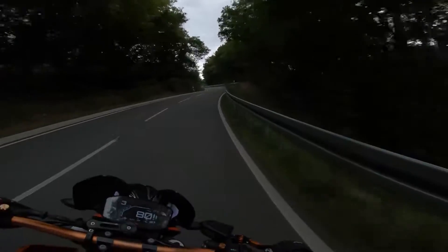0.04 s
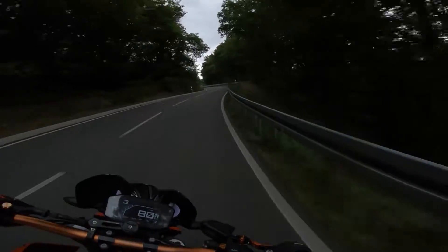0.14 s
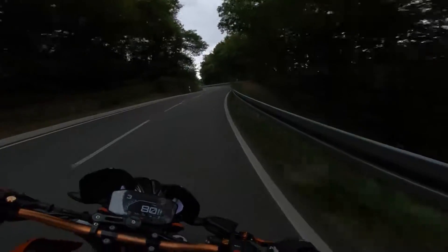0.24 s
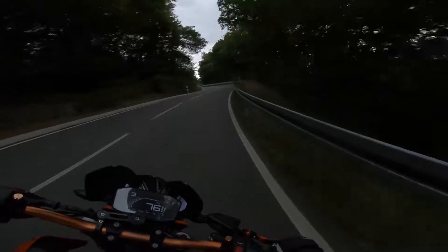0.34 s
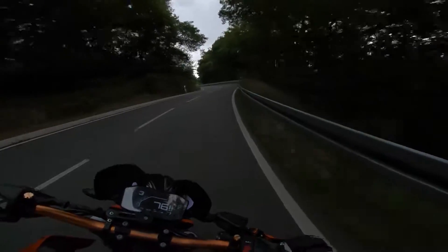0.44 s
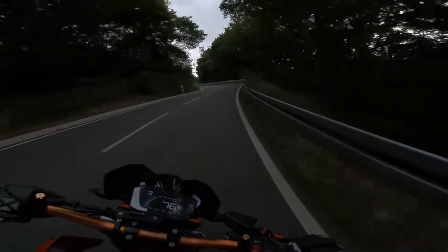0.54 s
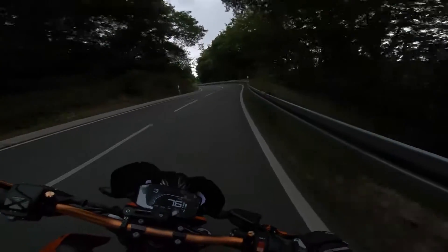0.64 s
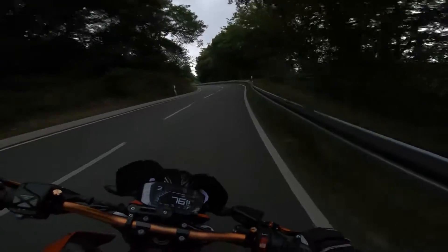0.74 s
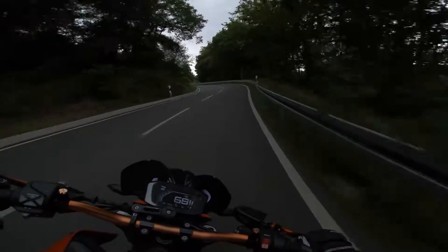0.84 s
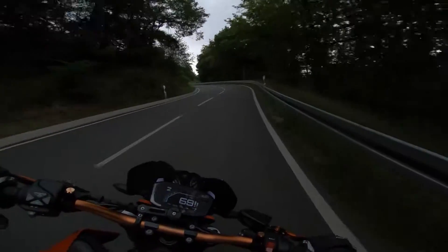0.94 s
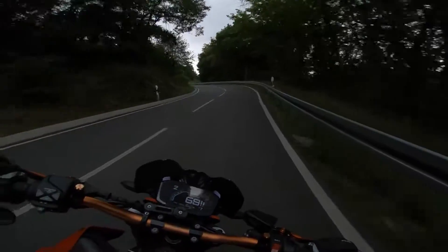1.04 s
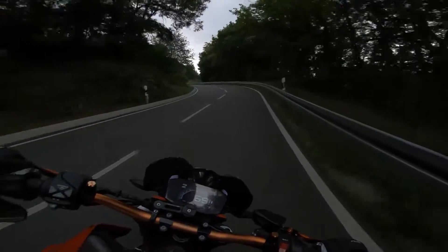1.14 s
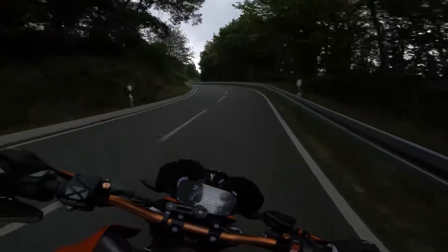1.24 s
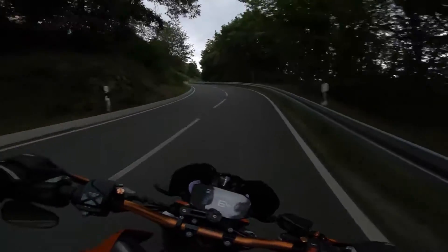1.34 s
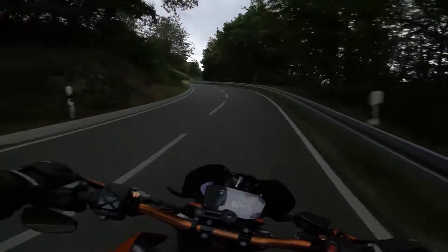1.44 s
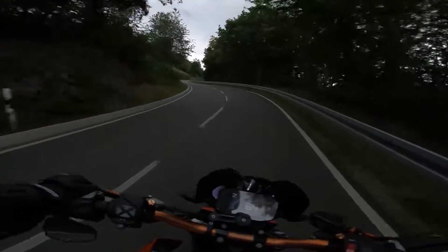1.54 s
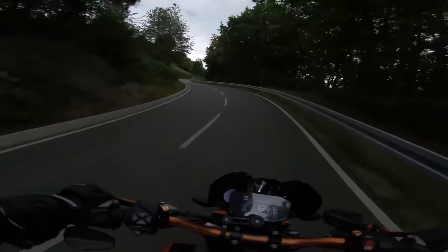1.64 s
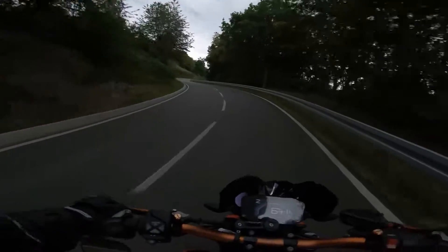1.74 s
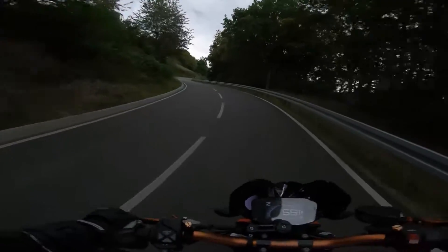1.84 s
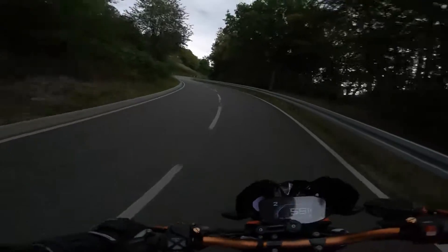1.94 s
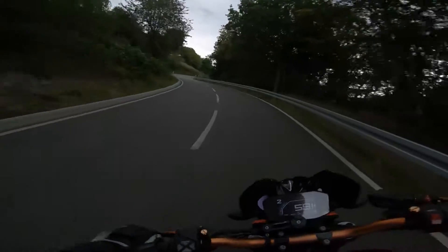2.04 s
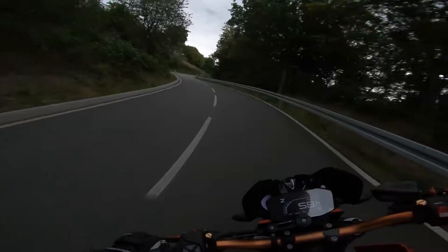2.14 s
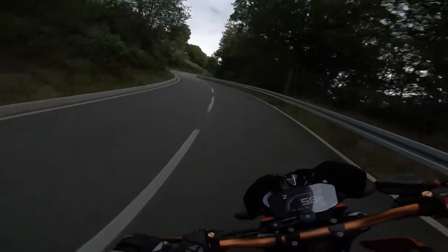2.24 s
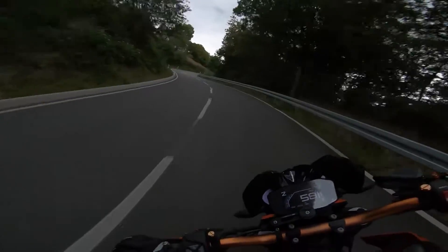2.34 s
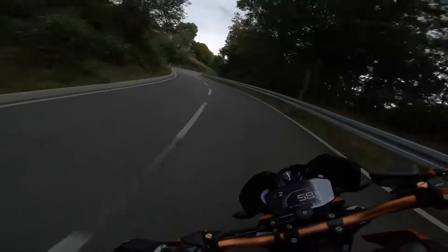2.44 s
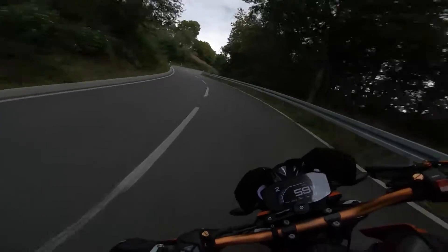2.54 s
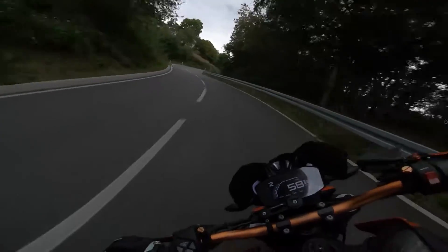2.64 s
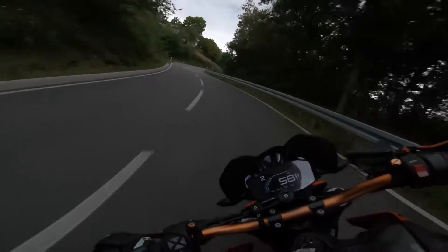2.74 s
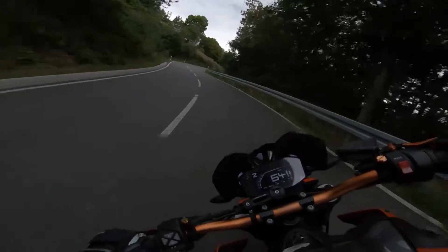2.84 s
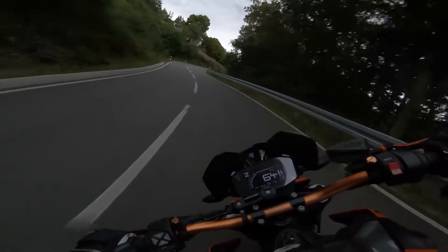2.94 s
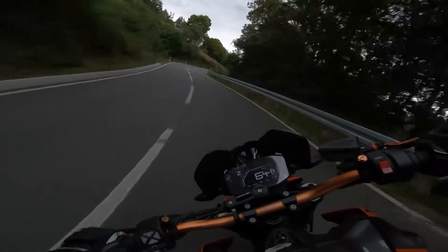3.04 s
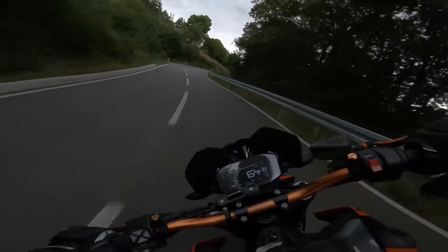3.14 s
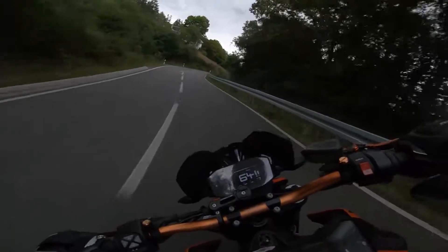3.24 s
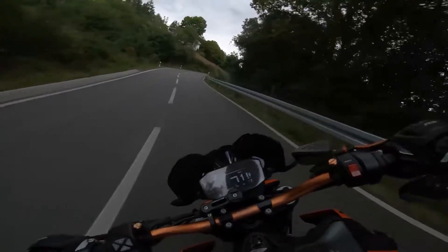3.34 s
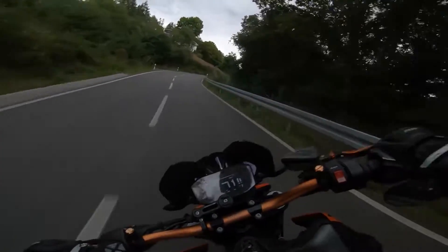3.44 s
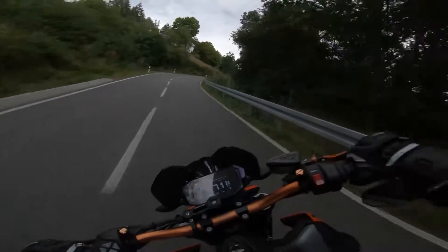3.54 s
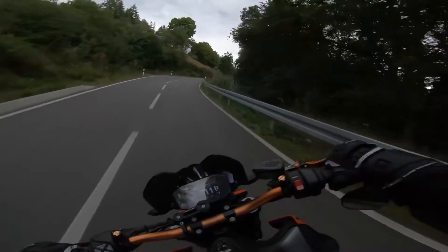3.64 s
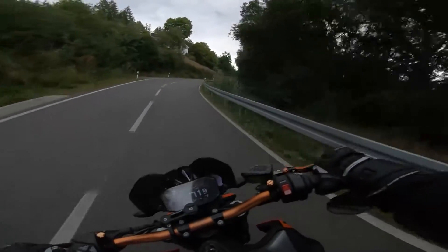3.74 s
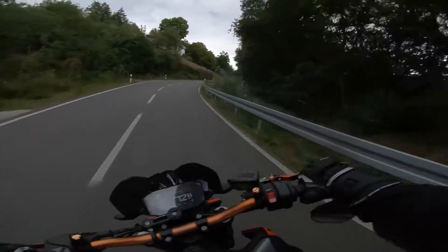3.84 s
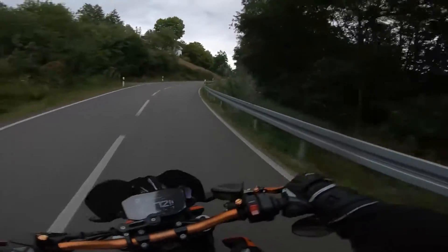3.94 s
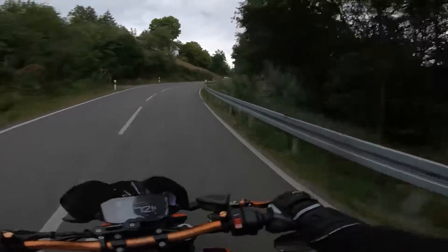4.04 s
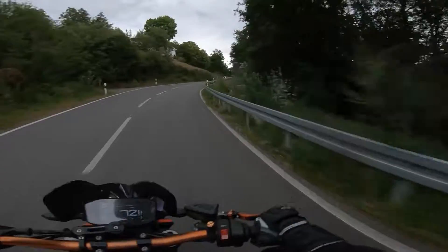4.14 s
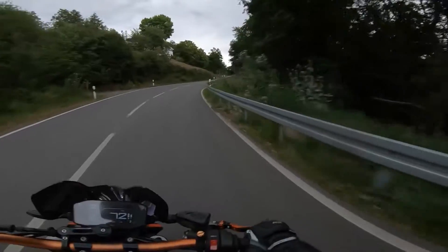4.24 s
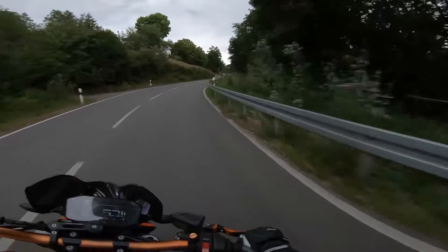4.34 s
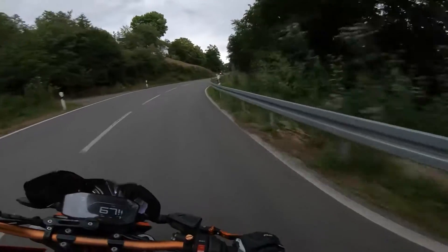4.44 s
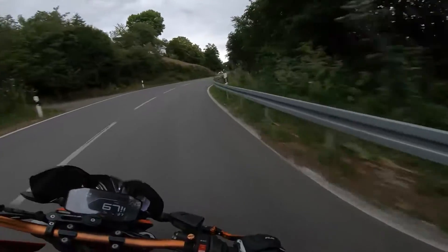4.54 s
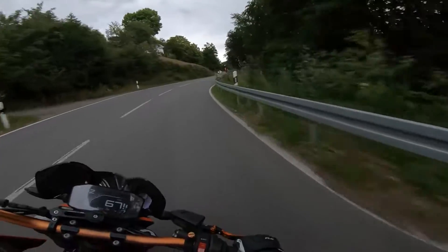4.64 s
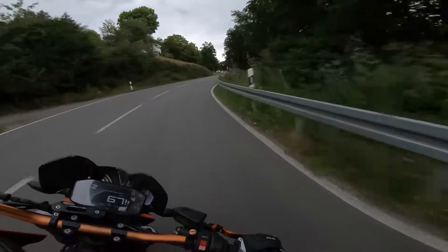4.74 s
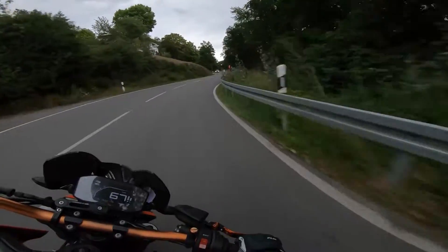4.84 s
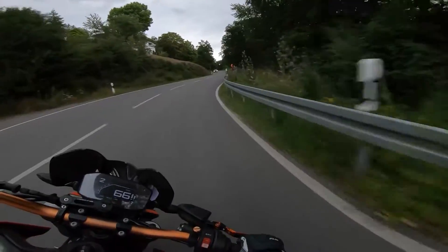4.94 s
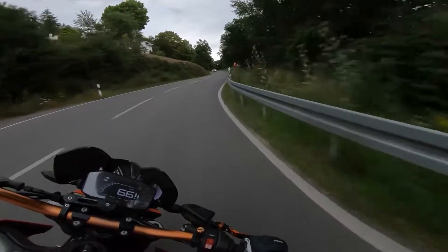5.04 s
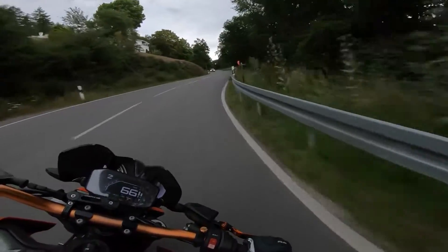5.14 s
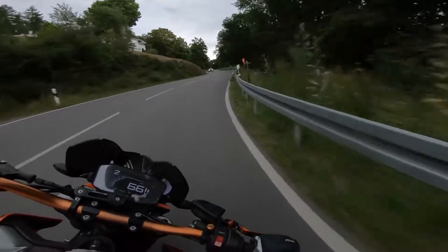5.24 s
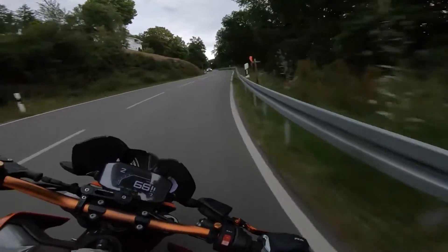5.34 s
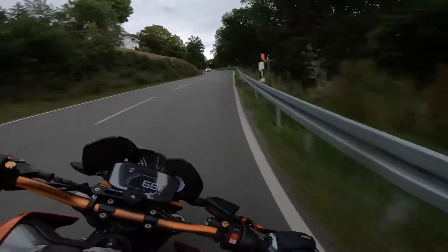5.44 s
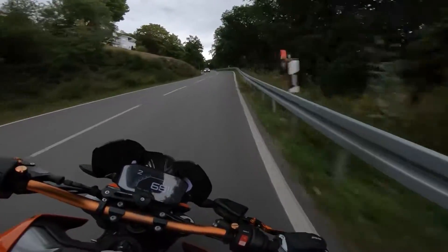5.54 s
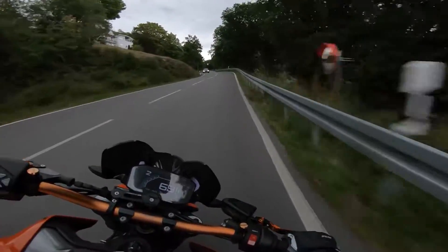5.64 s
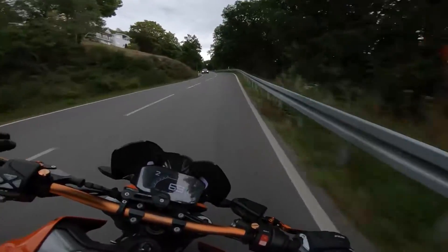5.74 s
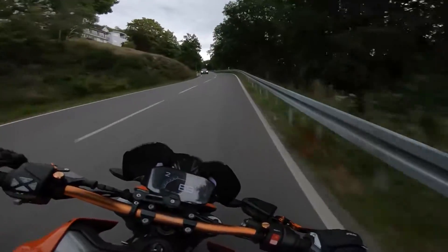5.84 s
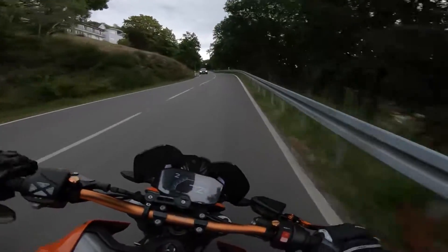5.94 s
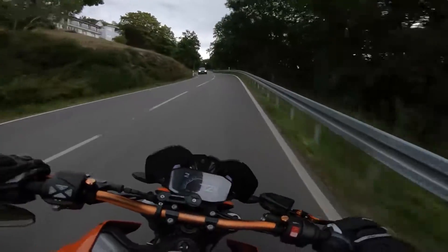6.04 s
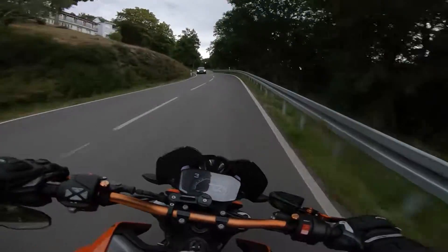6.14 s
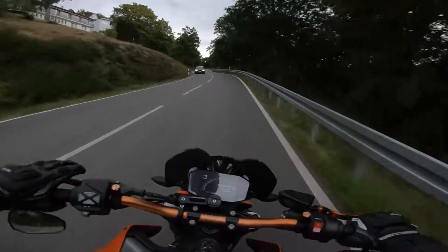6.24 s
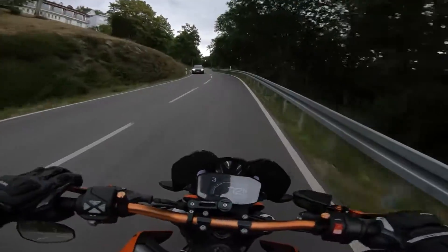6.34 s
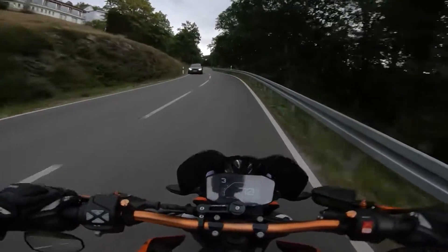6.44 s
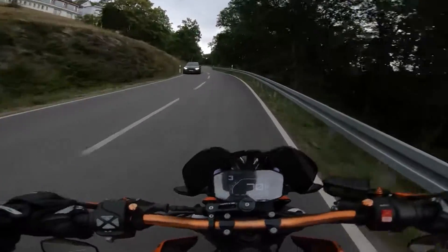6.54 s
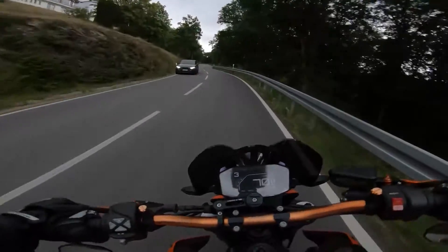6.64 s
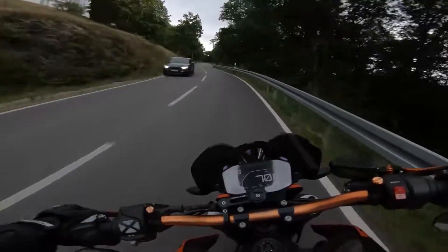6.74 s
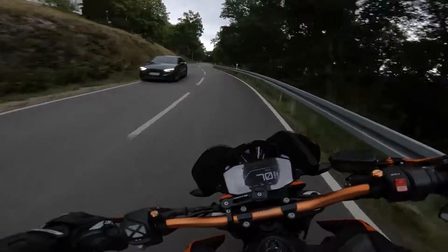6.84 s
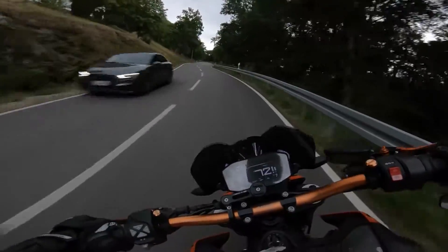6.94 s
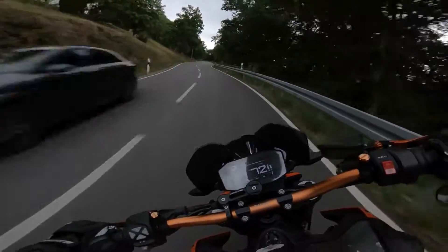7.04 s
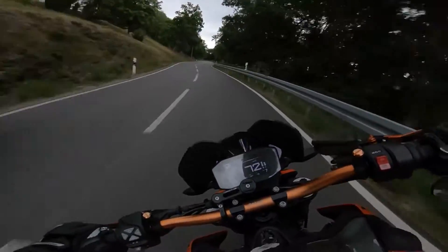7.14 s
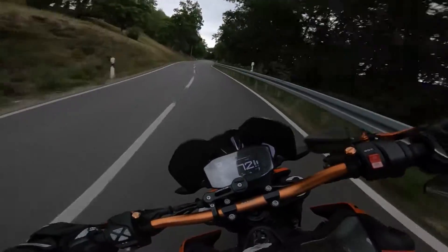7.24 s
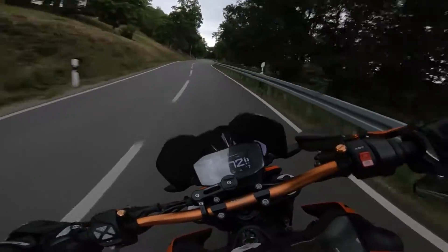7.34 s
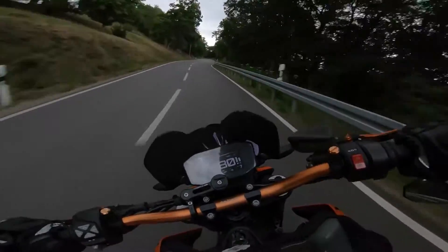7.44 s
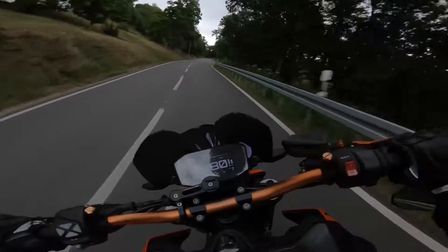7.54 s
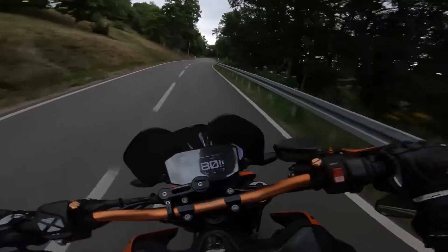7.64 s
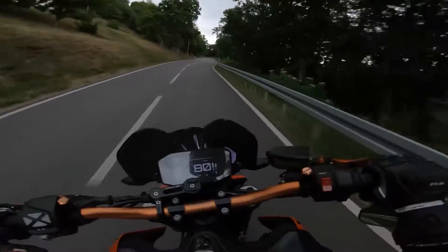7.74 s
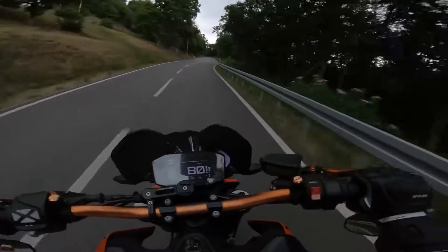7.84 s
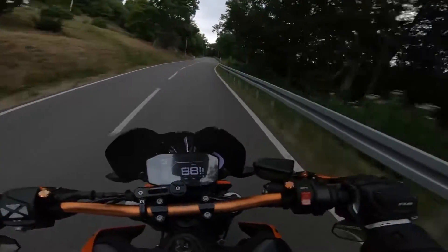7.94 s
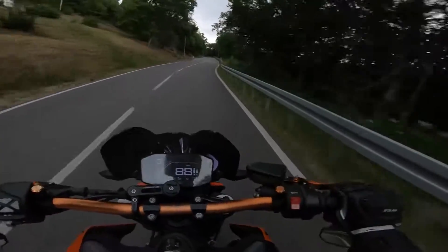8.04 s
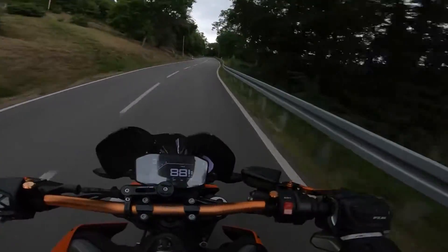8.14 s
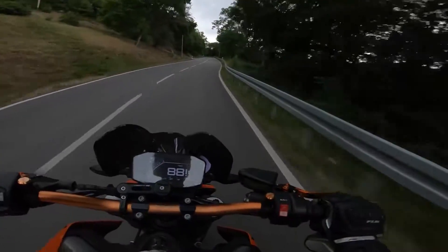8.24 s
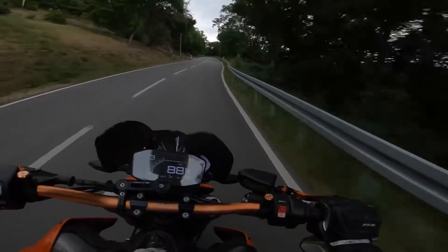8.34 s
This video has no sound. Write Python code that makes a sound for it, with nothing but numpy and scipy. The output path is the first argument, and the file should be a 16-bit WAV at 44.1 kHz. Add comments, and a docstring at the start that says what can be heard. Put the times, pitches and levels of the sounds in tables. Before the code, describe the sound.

A two-cylinder motorcycle throbs along, pulling and easing off several times, with exhaust pops while coasting and wind rushing behind.

```python
"""A two-cylinder motorcycle throbs along a country road, pulling and easing off, heard by the rider.
Two unevenly spaced firings in each engine cycle make the exhaust pipe ring and rasp, and the airbox
(where the engine breathes in) booms as the throttle opens. With the throttle shut and the revs low,
the engine stumbles and pops. Panels drone and gears whine under load. Behind them, wind buffets
the rider, and air rushing into and past the engine swells with the throttle."""
import sys
import numpy as np
from scipy import signal
from scipy.fft import rfft, irfft
from scipy.io import wavfile
from scipy.ndimage import uniform_filter1d

SR = 44100
rng = np.random.default_rng(int(sys.argv[2]) if len(sys.argv) > 2 else 0)


def file_out(sig):
    """Save sig as 16-bit WAV at sys.argv[1]."""
    # one column per channel
    cols = np.atleast_2d(sig).T
    # limit, then scale
    lim = np.clip(cols, -1, 1)
    pcm = np.round(lim * 32767).astype(np.int16)
    wavfile.write(sys.argv[1], SR, pcm)


N = 370440
TIME = np.arange(N) / SR

# The revs, shifting down at 0.7 s and up at 6.2 s. Each row: time in seconds, engine cycles per second.
ENGINE_SPEED = [(0.0, 40.8), (0.19, 39.55), (0.54, 37.35), (0.65, 37.75), (0.72, 46.55), (1.12, 43.75),
                (1.94, 38.7), (2.43, 42.35), (3.0, 49.2), (3.41, 53.2), (3.68, 50.1), (4.2, 45.4),
                (4.52, 44.5), (5.5, 49.7), (5.98, 50.25), (6.24, 37.55), (6.53, 37.05), (6.79, 38.75),
                (7.3, 44.7), (7.95, 49.4), (8.4, 54.45)]
# Pulls on the throttle; the first stays barely open. Each row: four times in seconds (opens, starts to
# widen, stops widening, is shut), opening 0-1, burn 0-1, panel drone in dB, gear whine in dB,
# extra engine level in dB.
THROTTLE_PULLS = [(-0.3, -0.25, -1.5, 0.66, 0.2, 0.8, -52, -88, 3.8),
                  (1.85, 2.3, 2.9, 3.65, 0.63, 0.96, -44, -73, 0),
                  (4.58, 5, 5.5, 6.05, 0.31, 1.0, -34.5, -79, -1.5),
                  (6.36, 6.22, 7.42, 9.02, 0.96, 0.93, -45, -72, 0)]
# Loudness under load. Each row: throttle 0-1, then gains in dB for exhaust, intake, rasp, rushing air.
LOAD_GAINS = [(0, 32, 3.5, -52.5, -42.5), (0.1, 31.3, 10, -58.5, -40.5), (0.3, 35, 17.5, -51.5, -35.3),
              (0.65, 39.3, 23, -42.3, -35), (1, 34.5, 31.5, -36.5, -32)]
# The tone of one exhaust pulse. Each row: frequency in Hz, level in dB coasting, level in dB firing.
PIPE_TONE = [(20.0, -31, 3), (44, -29.5, -13.5), (88.5, -16.5, -23.5), (119.7, 0.5, -6), (150.2, -0.5, -14),
             (165, -14.5, -5.5), (202.1, -20.5, -4), (242.7, -8.5, -17.5), (289.3, -8.5, -20.5),
             (357, -27, -36.5), (457, -35, -32), (547, -27, -24.5), (750, -37.5, -40.5), (1389, -55.5, -75)]
# The tones of six more sounds. Each row: frequency in Hz, relative level in dB.
AIRBOX_TONE = [(20.0, -31.5), (45.0, -10.5), (85.0, -15), (115.0, -6), (145.0, -1.5), (175.0, -5),
               (205.0, -5.5), (240.0, 0), (290.0, -0.5), (340.0, -2), (440.0, -14.5), (560.0, -27.5),
               (780.0, -28), (1500.0, -50)]  # one gulp of air
GAS_TONE = [(350, -27.5), (600, 4.5), (800, 4.5), (1000, -1.5), (1250, -1.5), (1390, 3.5), (1540, -1),
            (1700, -2.5), (2400, -10), (3200, -22.5), (4000, -31), (5000, -32.5), (7500, -45.5),
            (8800, -48.5), (10200, -48.5), (15000, -58.5)]  # gas leaving the silencer
CRACK_TONE = [(200, -12), (500, 2), (900, -1), (1400, 0), (2200, -2), (3200, -22), (5000, -28), (8000, -42),
              (14000, -58)]  # the sharp part of a pop
THUMP_TONE = [(30, -16), (80, -4), (135, 3), (180, -3), (280, 0), (400, -11), (700, -19), (1200, -32)]  # the hollow part of a pop
BUFFET_TONE = [(15, -6.5), (30, -3), (50, -4.5), (80, -5), (160, -8.5), (400, -30), (1000, -65)]  # wind hitting the rider
RUSH_TONE = [(60, 0), (150, 11.5), (300, 5.5), (450, 3.5), (700, 0), (950, -11.5), (1400, -17), (2200, -29),
             (3200, -30), (4200, -42), (6300, -46), (8500, -60.5), (15000, -66)]  # air rushing into and past the engine
# Loud pops in the pipe. Each row: start in seconds, crack gain in dB, thump gain in dB.
LOUD_POPS = [(0.5857, -29, -20.5), (1.0817, -23, -14), (1.2871, -18, -14), (1.3273, -26, -19),
             (1.3591, -17, -14), (1.4776, -18, -12), (1.5523, -21, -13.5), (1.8249, -29, -19),
             (1.974, -26, -19.5), (4.5256, -16.5, -11.5), (6.108, -18, -17), (6.2848, -29, -16)]
# Notes at which the tank and panels ring. Each row: frequency in Hz, width in Hz, relative level in dB.
PANEL_NOTES = [(101, 18, 2.5), (490, 22, -15), (555, 38, -7.5), (1046, 40, -29)]
# How the engine reaches the two microphones. Each row: frequency in Hz, the left side's lead in radians.
LEFT_LEAD = [(0, -0.3), (90, -0.1), (140, 1.1), (260, 1.15), (350, 0.85), (600, -0.39), (900, -0.015),
             (1300, 0.13), (2000, -0.4), (4000, 0)]

# The second cylinder: its delay in cycles, and its size compared with the first.
EXHAUST_TWIN, INTAKE_TWIN, RASP_TWIN = (0.394, 0.3), (0.4196, .33), (.396, .72)
BARELY_OPEN = 0.11  # the least throttle at which the engine fires fully
TAPS = 4096  # length of a ringing sound in samples


def exhaust(cycles):
    """Each puff of gas rings the pipe; hot gas shifts its tone away from the hollow coasting note."""
    times, sizes = strokes(cycles, EXHAUST_TWIN, scatter=0.76, slip=.00006)
    stumbling_burn = 0.45 * stumble(times)
    burn = ramp(per_pull(times, column=5, coasting=0) + stumbling_burn)[:, None]
    pulses = ring((1 - burn) * spectrum(PIPE_TONE) + burn * spectrum(PIPE_TONE, column=2))
    sizes = sizes * loudness(times, column=1, db_per_octave=7.5)
    return pan(place(times, sizes, pulses), left_db=2.5)


def intake(cycles):
    """Each cylinder sucks a gulp of air through the airbox."""
    times, sizes = strokes(cycles, INTAKE_TWIN, scatter=0.21, slip=.00004, lag_cycles=0.3076)
    gulp = -ring(spectrum(AIRBOX_TONE))  # negative, because it sucks
    sizes = sizes * loudness(times, column=2, db_per_octave=1.5)
    return pan(place(times, sizes, [gulp] * len(times)), left_db=2.0)


def rasp(cycles, puff_s=.0013):
    """Each firing sends a sharp pressure wave and a fresh puff of swirling gas through the silencer."""
    times, sizes = strokes(cycles, RASP_TWIN, scatter=1.4, slip=.00003)
    age = np.arange(TAPS // 4) / SR / puff_s
    puff = age * np.exp(-age)
    puffs = place(times, sizes, [puff] * len(times))
    # The silencer's inner walls smear the wave in time without changing its tone.
    echoes = rfft(puff * rng.standard_normal(len(puff)))
    wave = irfft(echoes / np.abs(echoes))
    buzz = place(times, sizes, [wave] * len(times))
    swirl, stray = cut([puffs * noise(), puffs * noise()], 4, 950, "high")
    direct = unit(colour(unit(swirl) + undb(-1) * unit(buzz), GAS_TONE))
    scattered = sides(undb(-10) * unit(colour(stray, GAS_TONE)))
    return (pan(direct, left_db=12.5) + scattered) * loudness(TIME, column=3, db_per_octave=7.5)


def pops(cycles, crack_s=0.00068, sputter_chance=0.15):
    """Unburnt fuel goes off in the pipe with a crack and a thump; stumbling adds small, random pops."""
    starts = np.interp(np.arange(int(cycles[-1])), cycles, TIME)
    lit = rng.random(len(starts)) < sputter_chance * stumble(starts)
    size_db = 2.2 * rng.standard_normal(len(starts))
    small_pops = np.column_stack([starts, size_db - 37, size_db - 21])  # same columns as LOUD_POPS
    times, crack_db, thump_db = np.vstack([LOUD_POPS, small_pops]).T
    heard = np.concatenate([np.ones(len(LOUD_POPS)), lit])
    age = np.arange(TAPS // 8) / SR / crack_s
    bursts = rng.standard_normal((len(times), len(age))) * age * np.exp(-age)
    cracks = colour(place(times, heard * undb(crack_db), bursts), CRACK_TONE)
    boom = ring(spectrum(THUMP_TONE))
    thumps = place(times + .0006, heard * undb(thump_db), [boom / boom.max()] * len(times))
    return pan(cracks, left_db=11) + pan(thumps, left_db=4.0)


def panels(cycles):
    """The engine shakes the tank and panels every cycle, and they drone at their own notes."""
    times, sizes = strokes(cycles, twin=(.5, .15), scatter=0.44, slip=.00002)
    shakes = cut(place(times, sizes, np.ones((len(times), 1))), 4, 1200, "low")
    drone = sum(undb(db) * signal.lfilter(*signal.iirpeak(hz, hz / width, SR), shakes)
                for hz, width, db in PANEL_NOTES)
    return pan(unit(drone) * undb(per_pull(TIME, column=6, coasting=-61)), left_db=2.5)


def gears(cycles, teeth_per_cycle=78, casing_hz=(2850, 4000)):
    """The gears whine under load while their pitch lies in the range where their casing rings."""
    smear = 1.2 * np.sin(2 * np.pi * cycles) + 1.4 * wander(220)  # the engine turns unevenly
    tone = np.sin(2 * np.pi * teeth_per_cycle * cycles + smear)
    whine = cut(unit(tone * undb(2.1 * wander(30))), 3, casing_hz, "band")
    return pan(whine * undb(per_pull(TIME, column=7, coasting=-87)), left_db=0.5)


def wind_and_engine_air(gust_at_s=6.5, gust_width_s=0.14):
    """Wind buffets the rider; air rushing into and past the engine swells with the throttle."""
    gust_db = 9 * np.exp(-((TIME - gust_at_s) / gust_width_s) ** 2)
    buffet = wide_noise(BUFFET_TONE, side_db=-10.5) * undb(-40 + gust_db + 2.4 * wander(11))
    rush_db = curve(LOAD_GAINS, throttle(TIME), column=4)
    rush = wide_noise(RUSH_TONE, side_db=-1.0) * undb(rush_db + 0.67 * wander(15))
    return buffet + rush


def throttle(t, pickup_s=0.15, shut_per_s=2.18):
    """Throttle opening, 0-1: a pull opens it a little, widens it smoothly, holds it and shuts it."""
    out = 0
    for opens, start, end, shut, opening in np.asarray(THROTTLE_PULLS)[:, :5]:
        widen = np.sin(np.pi / 2 * ramp((t - start) / (end - start))) ** 2
        held = ramp((t - opens) / pickup_s) * (BARELY_OPEN + (opening - BARELY_OPEN) * widen)
        out = out + np.minimum(held, ramp(shut_per_s * (shut - t)))
    return out


def pulling(t):
    """0 while the bike coasts with the throttle shut, 1 while the engine pulls."""
    return ramp(throttle(t) / BARELY_OPEN)


def stumble(t, below_hz=45.07, fade_hz=1.6):
    """How badly the engine stumbles, 0-1, as fuel cuts back in at low revs on a shut throttle."""
    return (1 - pulling(t)) * ramp((below_hz - curve(ENGINE_SPEED, t)) / fade_hz)


def strokes(cycles, twin, scatter, slip, lag_cycles=0):
    """Times and sizes of both cylinders' beats; scatter makes the sizes uneven, slip the timing."""
    twin_delay, twin_size = twin
    count = np.arange(int(cycles[-1]) + 1)
    beats = np.concatenate([count, count + twin_delay]) + lag_cycles
    inside = beats < cycles[-1]
    sizes = np.repeat([1, twin_size], len(count))[inside]
    times = np.interp(beats[inside], cycles, TIME)
    unevenness = 0.7 + 3.2 * stumble(times)
    strength, delay = rng.standard_normal((len(beats), 2))[inside].T * unevenness
    return times + slip * delay, sizes * undb(scatter * strength)


def loudness(t, column, db_per_octave):
    """Gain of one engine sound: set by the throttle, rising with the revs."""
    load_db = curve(LOAD_GAINS, throttle(t), column)
    revs_db = db_per_octave * np.log2(curve(ENGINE_SPEED, t) / 45)  # cruising is 45 cycles a second
    return undb(load_db + revs_db + per_pull(t, column=8, coasting=0))


def per_pull(t, column, coasting):
    """A setting with its own value in each pull and one shared value while coasting."""
    pulls = np.asarray(THROTTLE_PULLS)
    latest = np.maximum(np.searchsorted(pulls[:, 0], t) - 1, 0)
    return coasting + pulling(t) * (pulls[latest, column] - coasting)


def undb(db):
    """Turn decibels into a gain."""
    return 10 ** (np.asarray(db) / 20)


def unit(x):
    """Scale a sound to an average power of 1."""
    return x / np.sqrt(np.mean(x ** 2))


def ramp(x):
    """Keep a value between 0 and 1."""
    return np.clip(x, 0, 1)


def curve(table, at, column=1):
    """Read a table's column, drawing straight lines between its rows."""
    table = np.asarray(table)
    return np.interp(at, table[:, 0], table[:, column])


def spectrum(table, column=1):
    """Fill in a tone table's dB levels at all frequencies, falling 12 dB an octave past its end."""
    table = np.asarray(table)
    hz = np.arange(TAPS // 2 + 1) * SR / TAPS + 1
    fall_db = 40 * np.log10(np.maximum(hz / table[-1, 0], 1))
    return np.interp(np.log(hz), np.log(table[:, 0]), table[:, column]) - fall_db


def ring(db):
    """The sound of one tap on something with this spectrum."""
    cepstrum = irfft(db * np.log(10) / 20)
    # Folding the second half onto the first puts all the ringing after the tap.
    cepstrum[..., 1:TAPS // 2] *= 2
    cepstrum[..., TAPS // 2 + 1:] = 0
    return irfft(np.exp(rfft(cepstrum)))


def colour(x, table):
    """Give a sound the tone in a table."""
    return signal.fftconvolve(x, ring(spectrum(table)))[:N]


def cut(x, order, hz, keep):
    """Filter a sound, keeping the lows, the highs or a band."""
    return signal.sosfilt(signal.butter(order, hz, keep, fs=SR, output="sos"), x)


def place(times, sizes, sounds):
    """Lay out one short sound per time, split between neighbouring samples."""
    out = np.zeros(N + 2 * TAPS)
    for at, size, sound in zip(np.clip(times * SR, 0, N), sizes, sounds):
        i, late = int(at), at % 1
        out[i:i + len(sound)] += size * (1 - late) * sound
        out[i + 1:i + 1 + len(sound)] += size * late * sound
    return out[:N]


def noise():
    """White noise."""
    return rng.standard_normal(N)


def wander(per_second):
    """A random drift with a typical size of 1."""
    hold = int(SR / per_second)
    steps = np.repeat(rng.standard_normal(N // hold + 1), hold)
    return unit(uniform_filter1d(steps, hold)[:N])


def sides(x):
    """Plus on the left, minus on the right."""
    return x * np.array([[1], [-1]])


def pan(x, left_db):
    """Move a sound to one side, keeping the level of the middle."""
    gains = undb(sides(left_db) / 2)
    return x * gains / gains.mean()


def wide_noise(table, side_db):
    """Stereo noise with the tone in a table."""
    middle = unit(colour(noise(), table))
    return middle + sides(undb(side_db) * unit(colour(noise(), table)))


def out_of_step(x):
    """The engine reaches the left and right microphones slightly out of step."""
    hz = np.arange(N + 1) * SR / (2 * N)
    lead = curve(LEFT_LEAD, hz) / 2
    return irfft(rfft(x, 2 * N) * np.exp(1j * sides(lead)) / np.cos(lead))[:, :N]


def scene():
    """One count of engine cycles keeps the engine's parts in time; wind and rushing air lie behind."""
    cycles = np.cumsum(curve(ENGINE_SPEED, TIME)) / SR
    engine = sum(source(cycles) for source in (exhaust, intake, rasp, panels, pops, gears))
    return out_of_step(engine) + wind_and_engine_air()


def record(dry):
    """Take away the deepest rumble and the highest treble."""
    thinned = cut(dry, 2, 24, "high")
    return signal.sosfilt(signal.ellip(8, .2, 70, 15700, fs=SR, output="sos"), thinned)


dry = scene()
out = record(dry)
file_out(out)
```